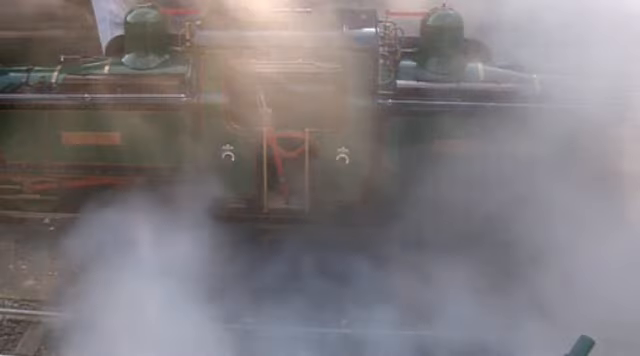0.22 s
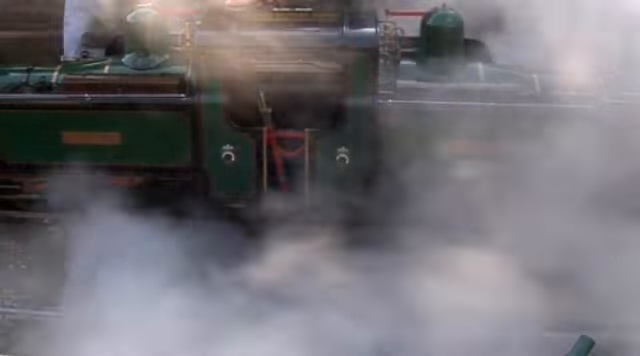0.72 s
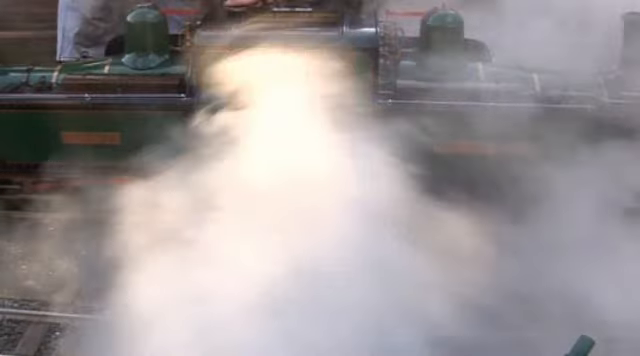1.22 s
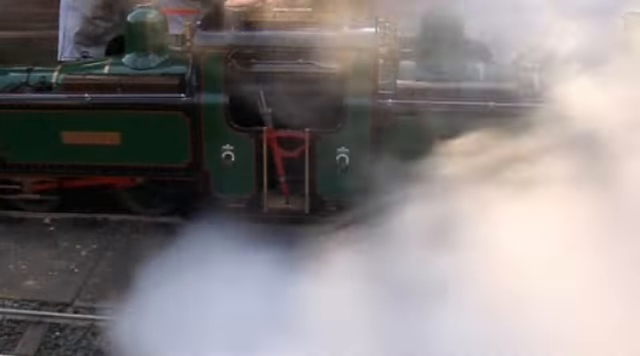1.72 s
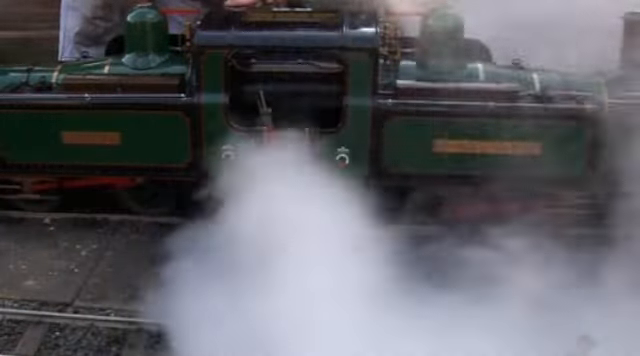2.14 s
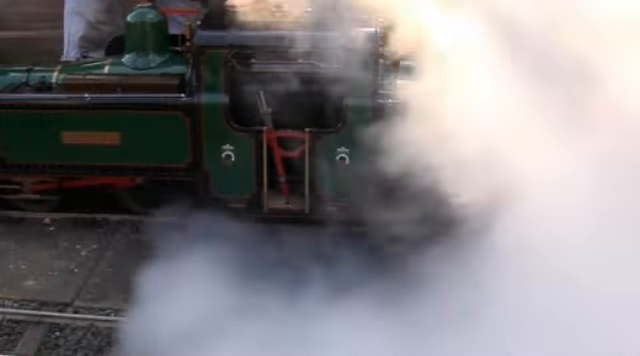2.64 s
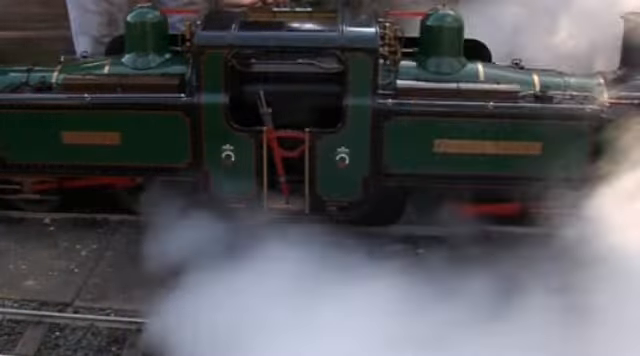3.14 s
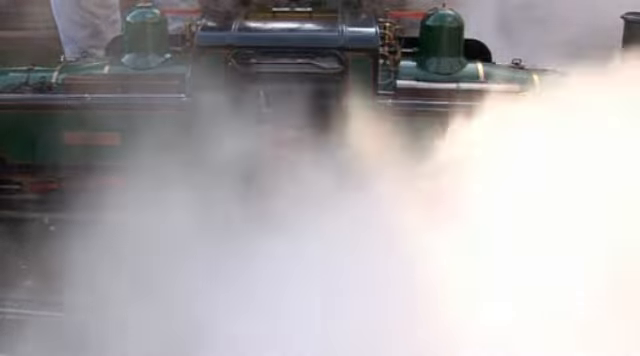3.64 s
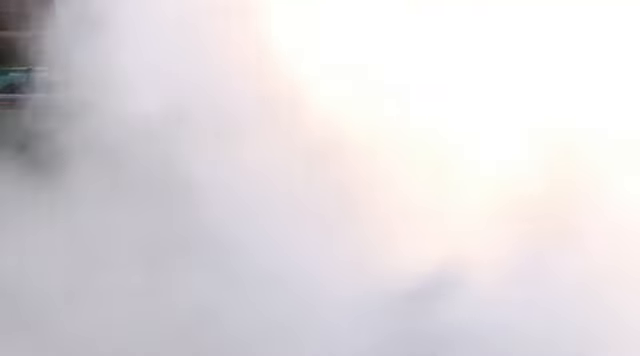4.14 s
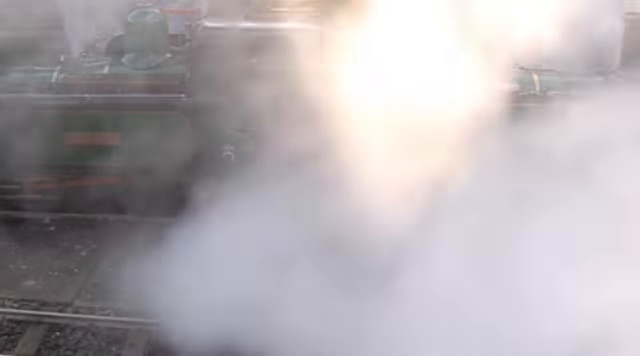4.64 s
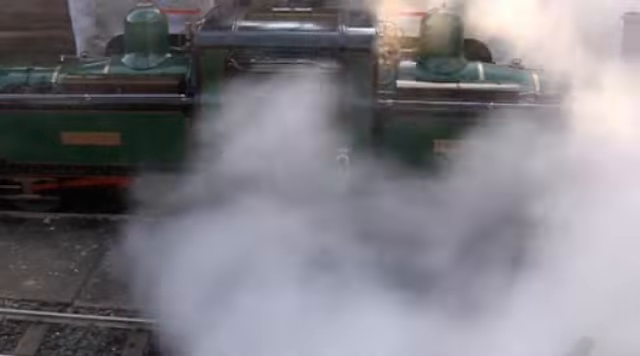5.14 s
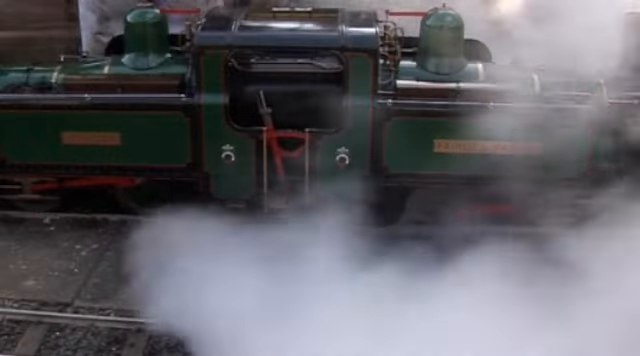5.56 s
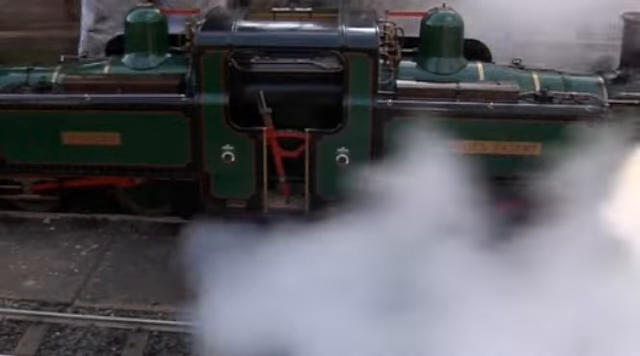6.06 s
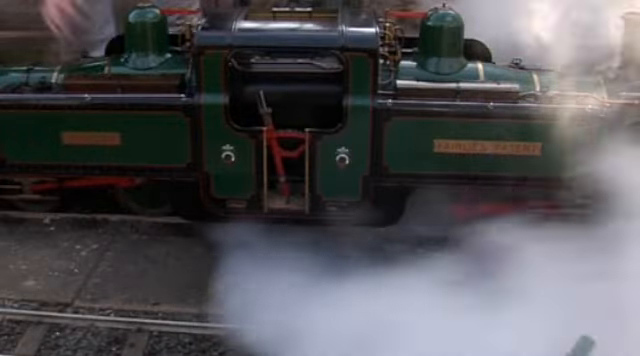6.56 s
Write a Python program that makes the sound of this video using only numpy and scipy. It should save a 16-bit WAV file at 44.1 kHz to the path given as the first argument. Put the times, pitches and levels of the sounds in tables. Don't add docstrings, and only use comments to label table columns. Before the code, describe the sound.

Close outdoor steam blowdown: dense, slightly hollow rushing hiss with drifting colour, full for several seconds, then easing as pressure drops.

```python
import sys
import numpy as np
from scipy import signal
from scipy.fft import rfft, irfft, next_fast_len
from scipy.io import wavfile
from scipy.ndimage import uniform_filter1d

SR = 44100
rng = np.random.default_rng(int(sys.argv[2]) if len(sys.argv) > 2 else 0)


def invert_db(x):
    u = np.asarray(x, float) / 20
    return 10 ** u


def transcribe(signal):
    frames = np.atleast_2d(signal).T
    limited = np.clip(frames, -1, 1)
    pcm = np.round(limited * 32767).astype(np.int16)
    wavfile.write(sys.argv[1], SR, pcm)


N = 300302


def evened(x):
    return x / np.sqrt(np.mean(x ** 2) + 1e-20)


def read(points, hz):
    f, value = np.transpose(points)
    return np.interp(np.log(hz + 1), np.log(f + 1), value)


def bells(rows, t):
    return sum(db * np.exp(-0.5 * ((t - s) / half) ** 2) for s, half, db in rows)


def patches(shape, bins, frames):
    field = rng.standard_normal(shape[::-1]).T
    for _ in range(2):
        field = uniform_filter1d(field, bins, 0)
        field = uniform_filter1d(field, frames, 1)
    return evened(field)


def surroundings(hz, frames, drift_ms=0.0038, breathe=0.04):
    # delay in ms, signed strength.
    echoes = [(0.305, 0.13), (0.501, -0.15), (0.734, -0.21), (0.82, 0.11), (0.885, -0.1), (1.246, 0.14),
              (1.334, -0.12), (1.959, 0.14), (2.262, 0.04), (2.309, 0.08), (2.614, -0.04), (2.986, 0.06)]
    # centre in Hz, width in Hz, gain in dB.
    cavities = [(220, 85, 6.0), (440, 42, -8), (499, 173, 9.5), (530, 84, -11), (853, 35, 2),
                (1106, 160, -3), (1628, 128, -10.5), (1688, 237, 9), (1936, 76, -11.5), (1979, 93, 8.5),
                (2170, 26, 7), (2326, 19, 2), (2390, 36, 3.0), (2793, 33, 11), (2896, 29, 12),
                (2920, 55, -10), (3100, 82, 5), (3273, 236, -4.5), (3630, 57, 3), (4670, 57, -5.5),
                (5210, 100, 3.5), (5434, 78, 9.0), (6076, 61, -3), (6650, 110, -7), (6670, 65, 6),
                (7480, 58, -7), (8745, 244, -8.5), (9400, 84, -2)]
    delay_ms, strength = np.transpose(echoes)
    shape = (len(echoes), frames)
    delay_s = (delay_ms[:, None] + drift_ms * patches(shape, bins=1, frames=30)) / 1000
    strength = strength[:, None] * (1 + breathe * patches(shape, bins=1, frames=30))
    comb = 1 + sum(g * np.exp(-2j * np.pi * hz[:, None] * d) for d, g in zip(delay_s, strength))
    rings = sum(db / (1 + (2 * (hz - centre) / width) ** 2) for centre, width, db in cavities)
    return 20 * np.log10(abs(comb) + 1e-3) + rings[:, None]


def layer_tilt(hz, t, veil, veil_jet):
    layer_hz = [1100, 1700, 4100, 4600, 5600, 6300]
    # centre in seconds, half-length in seconds, gain in dB.
    flares = [(.1, 0.14, -0.5), (.53, .06, 0), (1.06, 0.068, 2), (2.55, .08, 0.5), (3.45, .1, 1),
              (1.72, 0.057, 1), (2.75, .08, 1.5), (3.75, .15, -2), (5.15, 0.055, 0.5), (6, 0.11, -2),
              (6.75, 0.27, 3)]
    # centre in seconds, half-length in seconds, gain in dB.
    spits = [
        (.85, .12, 1),
        (1.17, 0.045, 2.5),
        (1.7, 0.13, -1.5),
        (3.68, 0.085, 0),
        (5.02, 0.067, 0.3),
        (6.2, 0.086, 1),
    ]
    roar = (0.068 - veil_jet) * veil
    nozzle = (1.35 - veil_jet) * veil + bells(flares, t)
    fizz = (0.97 - veil_jet) * veil + bells(spits, t)
    still = 0 * t
    layers = [c - c.mean() for c in (roar, still, still, nozzle, nozzle, fizz)]
    shares = [np.interp(np.log(hz + 1), np.log(layer_hz), row) for row in np.eye(len(layers))]
    return np.transpose(shares) @ layers


def steam():
    # frequency in Hz, density in dB per Hz.
    jet = [(25, -48), (45, -30), (70, -24), (115, -4.5), (150, -3), (400, -8), (800, -10.5), (1400, -1.46),
           (2000, -2), (3200, -3), (5000, -0.5), (7000, -5), (9000, -2), (10600, -10.5)]
    # time in seconds, level in dB.
    pressure = [
        (0, -27.5),
        (1.9, -26),
        (3.7, -26),
        (4.6, -26.5),
        (5.6, -32.5),
        (6.81, -38.5),
    ]
    # centre in seconds, half-length in seconds, gain in dB.
    clouds = [(.1, .08, 0.5), (.35, 0.13, -0.5), (1.05, .15, 0.5), (1.3, 0.1, -1.5), (1.7, 0.14, 1.5),
              (2.03, .1, 0.9), (2.32, 0.11, -2), (3.7, 0.13, 1.5), (4.25, 0.16, -1.2), (4.72, 0.16, -1.4),
              (5.95, 0.065, 0.5)]
    size, hop = 2048, 512
    frames, hz = N // hop + 5, np.fft.rfftfreq(size, 1 / SR)
    shape, t = (len(hz), frames), np.arange(frames) * hop / SR

    veil, veil_jet = bells(clouds, t), 0.64
    jet_db = np.interp(t, *np.transpose(pressure)) + veil_jet * veil
    treble = np.clip(hz / 8000, 0.1, 1.2)[:, None]
    far_echoes = 2.5 * patches(shape, bins=2, frames=40) * np.minimum(treble, 0.6) ** 0.67
    puffs = 1.22 * patches(shape, bins=24, frames=2) * treble
    colour = read(jet, hz)[:, None] + surroundings(hz, frames) + layer_tilt(hz, t, veil, veil_jet)
    colour = colour + far_echoes + puffs

    a, b = rng.standard_normal((frames, len(hz), 2)).T
    turbulence = (a + 1j * b) * invert_db(colour)
    hiss = signal.istft(turbulence, nperseg=size, noverlap=size - hop)[1][:N]
    band = signal.butter(4, [1500, 4300], "band", fs=SR, output="sos")
    jet_band = signal.sosfilt(band, hiss)
    return hiss / np.std(jet_band) * invert_db(np.interp(np.arange(N) / SR, t, jet_db))


def sputter(x, depth_db=0.1, split_hz=4000):
    flutter = uniform_filter1d(rng.standard_normal(N), size=200)
    flutter = evened(uniform_filter1d(flutter, size=200))
    fizz = signal.sosfiltfilt(signal.butter(2, split_hz, "high", fs=SR, output="sos"), x)
    return x + fizz * (invert_db(depth_db * flutter) - 1)


def scene():
    return np.tile(sputter(steam()), (2, 1))


def half_rate(x):
    # frequency in Hz, level in dB.
    leak = [(11320, -14), (11460, -8), (11670, -13), (11890, -20), (12100, -26), (12320, -34), (12400, -42),
            (12500, -90)]
    edge_hz, skirt = 10690, 0.4
    size = next_fast_len(N)
    size += size % 2
    hz = np.fft.rfftfreq(size, 1 / SR)
    spectrum = rfft(x, size) * invert_db(np.clip(edge_hz - hz, -400, 0) * skirt)
    mirror = np.conj(spectrum[:, ::-1]) * invert_db(read(leak, hz))
    return irfft(spectrum + mirror, size)[:, :N]


def channel_splits(x):
    # centre in seconds, low edge in Hz, high edge in Hz, level in dB.
    splits = [
        (2.3155, 4660, 5690, -33),
        (3.6159, 6900, 8260, -39),
    ]
    size = 2048
    hz = np.fft.rfftfreq(size, 1 / SR)
    window = signal.windows.kaiser_bessel_derived(size, 4 * np.pi)
    for s, low_hz, high_hz, db in splits:
        in_band = abs(hz - (low_hz + high_hz) / 2) < (high_hz - low_hz) / 2
        noise = rfft(rng.standard_normal(size)) * in_band
        burst = invert_db(db) * evened(irfft(noise)) * window
        x[:, round(s * SR) - size // 2:][:, :size] += np.outer([1, -1], burst)
    return x


def top_cut(x):
    return signal.sosfilt(signal.butter(12, 12500, fs=SR, output="sos"), x)


def record(dry):
    mix = channel_splits(half_rate(dry))
    return top_cut(mix)


dry = scene()
out = record(dry)
transcribe(out)
```